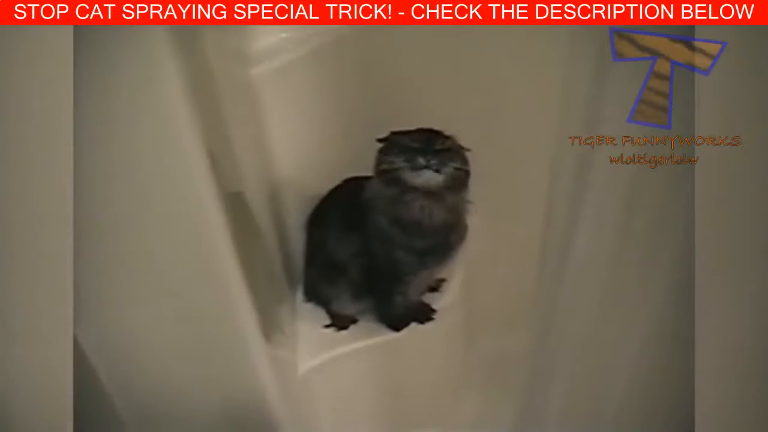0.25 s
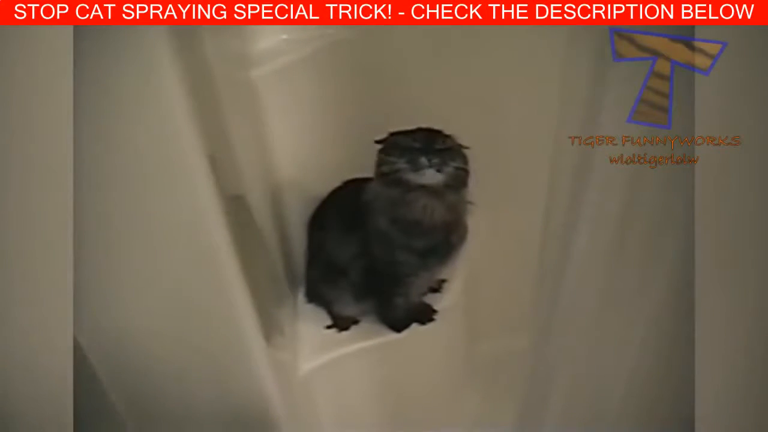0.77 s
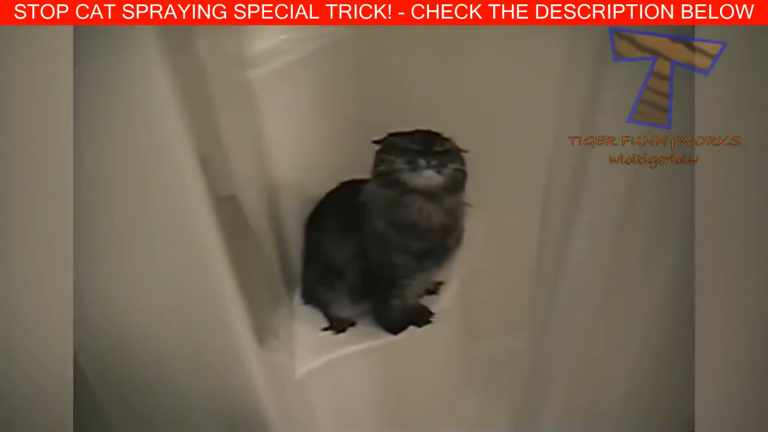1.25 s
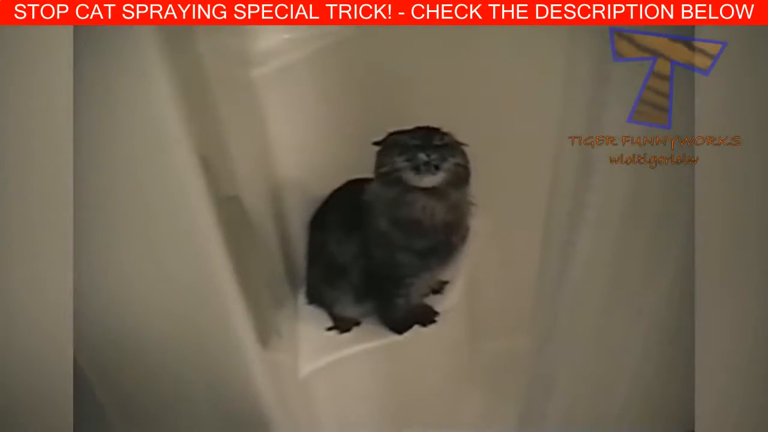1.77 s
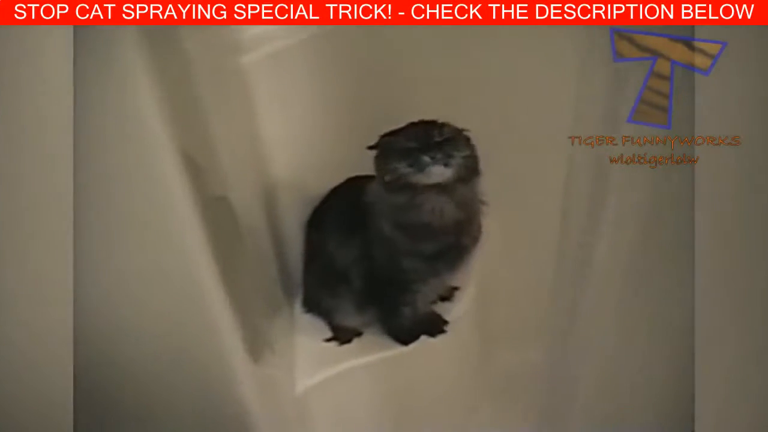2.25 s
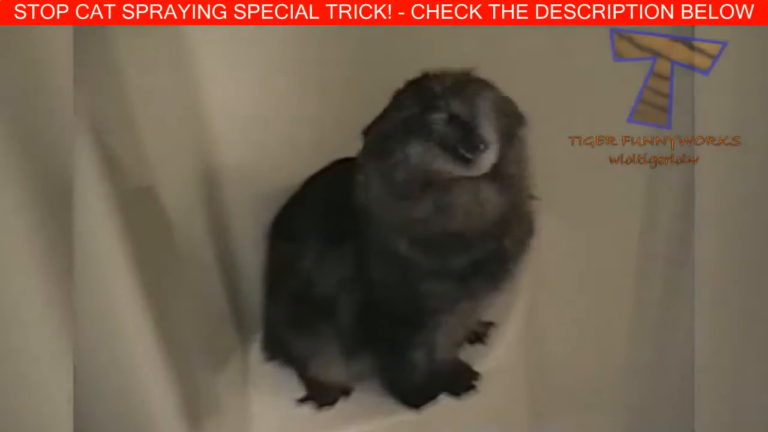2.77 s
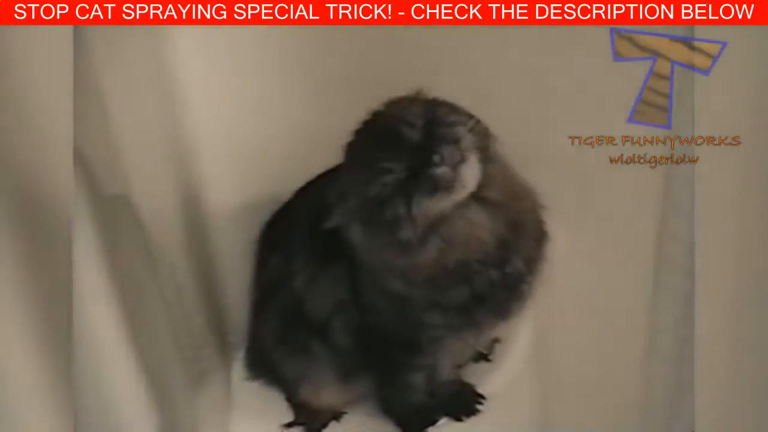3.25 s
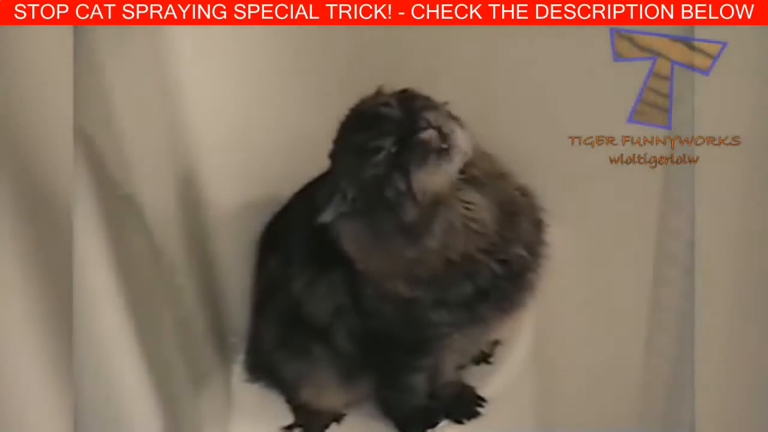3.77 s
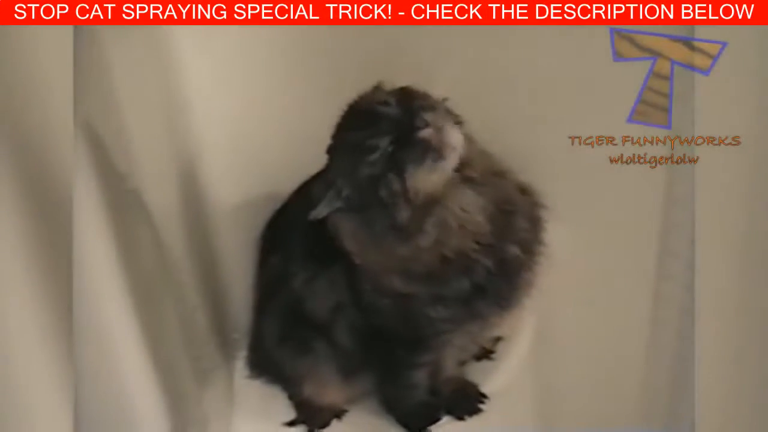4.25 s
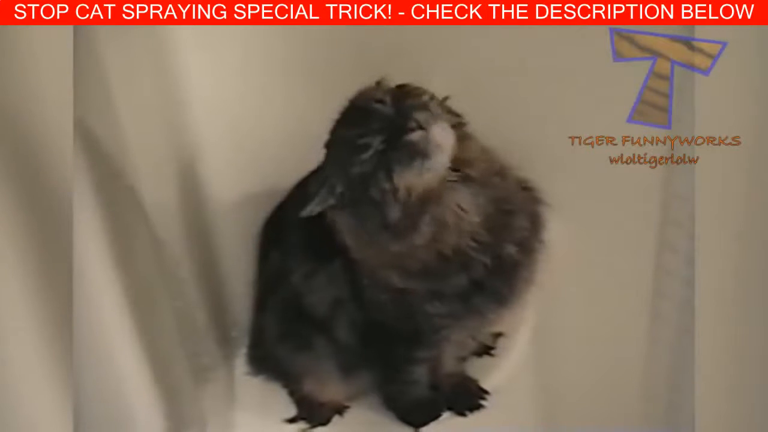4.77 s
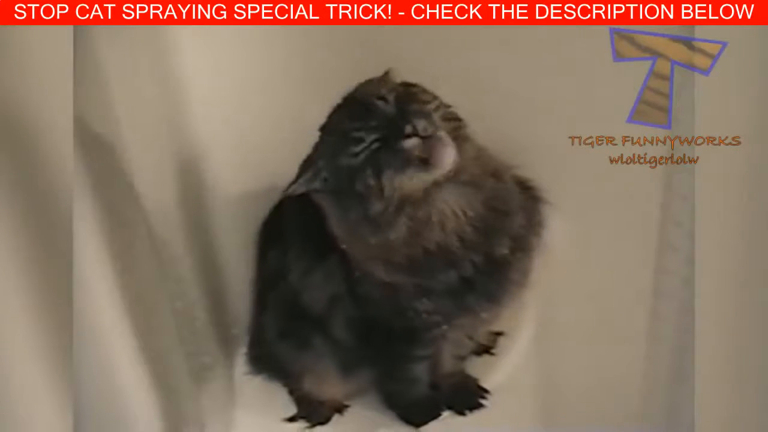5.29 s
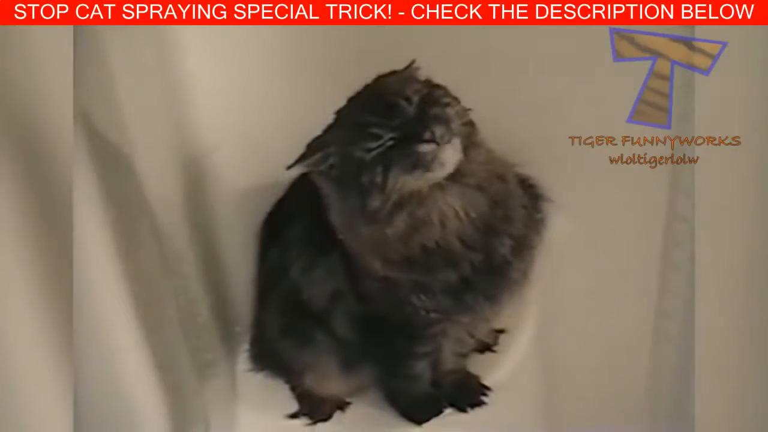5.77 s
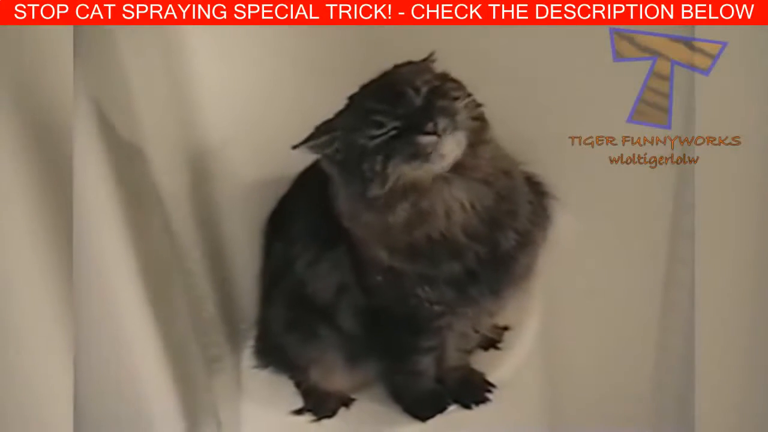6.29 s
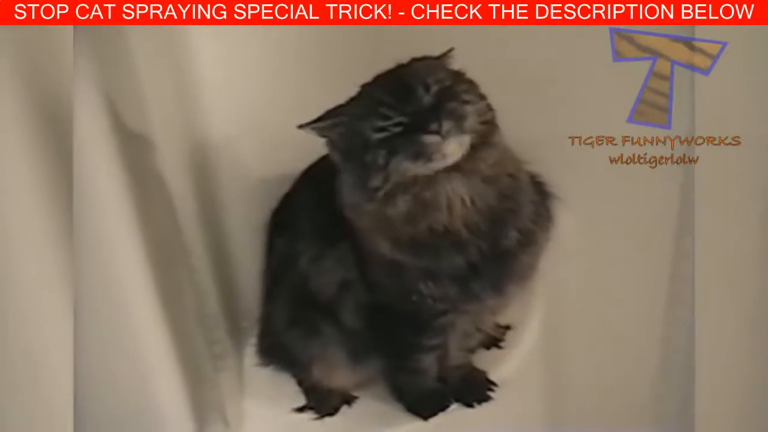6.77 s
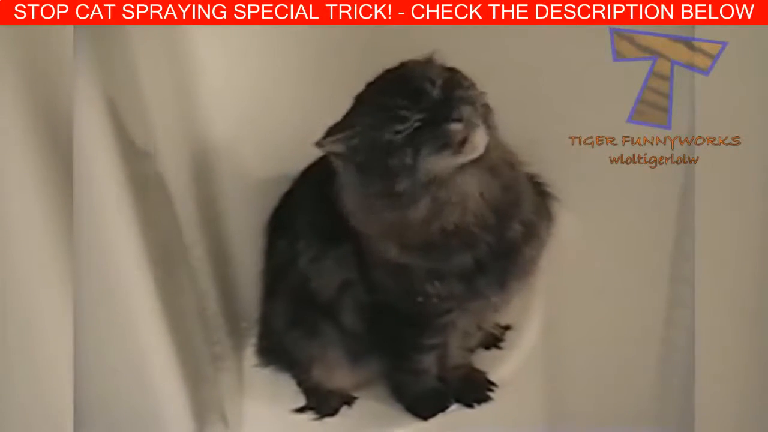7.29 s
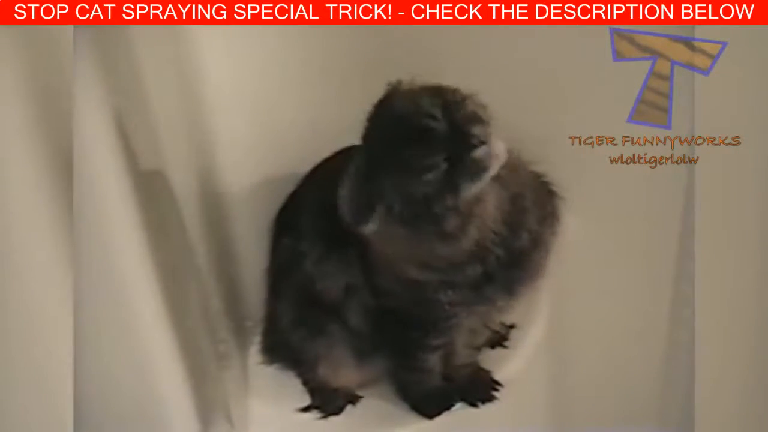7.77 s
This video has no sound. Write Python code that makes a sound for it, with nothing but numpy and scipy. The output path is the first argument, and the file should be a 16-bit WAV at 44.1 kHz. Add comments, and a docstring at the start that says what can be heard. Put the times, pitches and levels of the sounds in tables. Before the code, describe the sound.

From 0 to about 8 seconds a shower sprays continuously into a bathtub. The hiss is bright and grainy, made of thousands of tiny droplets, strongest in the high treble, and its strength drifts only slightly, a little fuller at the start and softer near 4 and 5.5 seconds. Clumps of water slap down irregularly throughout, each a very short smack, a fizzing burst and a short hard-walled bathroom tail. Bold ones come around 0.1 to 0.5, 1.8 to 2.2, 2.7 to 3.0, 4.35, 6.3 to 6.7 and 7.7 seconds. Under this the tub floor drums and rings in a soft, uneven low rumble, and a fan hums faintly. The sound is mono, close, hollow and gently phasing, with slight recorder hiss and no extreme top. It ends with the water still running.

```python
"""A shower hisses into a bathtub with a hollow, phasing colour, and clumps of water splash down in it.
The hiss is thousands of random droplet impacts; each splash is a slap and a burst of droplets,
with the short ring of a small hard room. The tub floor drums and rings, and a fan hums faintly.
The mono sound is doubled by a wavering copy about a millisecond late, which hollows the hiss."""
import sys
import numpy as np
from scipy import signal
from scipy.fft import rfft, irfft, next_fast_len
from scipy.io import wavfile
from scipy.ndimage import map_coordinates

SR = 44100
rng = np.random.default_rng(int(sys.argv[2]) if len(sys.argv) > 2 else 0)


def wrap_up_sound(samples):
    """Save the sound to the file named by the first command line argument, as 16-bit audio."""
    columns = np.atleast_2d(samples).T
    # keep every value between -1 and 1, then stretch to whole-number steps
    tamed = np.clip(columns, -1, 1)
    steps = np.round(tamed * 32767).astype(np.int16)
    wavfile.write(sys.argv[1], SR, steps)


N = 354485  # length of the sound in samples


def undb(db):
    """Turn decibels into a gain."""
    return 10 ** (np.asarray(db) / 20)


def level(x, db):
    """Scale a sound to an rms (average) level in dB."""
    return x * undb(db) / np.sqrt(np.mean(x ** 2))


def curve(rows):
    """Join (seconds, value) rows by straight lines, one value per sample."""
    return np.interp(np.arange(N) / SR, *np.transpose(rows))


def colour(x, points):
    """Make some pitches louder than others, following (Hz, dB) points."""
    size = next_fast_len(N + SR // 4)
    hz, db = np.transpose(points)
    f = np.maximum(np.fft.rfftfreq(size, 1 / SR), 1)
    gain = undb(np.interp(np.log(f), np.log(hz), db))
    return irfft(rfft(x, size) * gain, size)[:N]


def band(x, hz, octaves, order=2):
    """Keep a band of pitches around a centre; order 1 fades out gently at the sides."""
    edges = hz * 2 ** (np.array([-.5, .5]) * octaves)
    return signal.sosfilt(signal.butter(order, edges, "band", fs=SR, output="sos"), x)


def resonate(x, hz, width):
    """Ring at one pitch, like a struck body; gain 1 at its centre, and a narrow width rings longer."""
    b, a = signal.iirpeak(hz, hz / width, fs=SR)
    return signal.lfilter(b, a, x)


def drops(count, rate, spread_db):
    """Impacts at random moments, rate per second, of random size and sign; rms 1."""
    lands = rng.random(count) < rate / SR
    size = undb(spread_db * np.minimum(rng.exponential(size=count), 5))
    sign = rng.choice([-1, 1], count)
    return level(lands * size * sign, 0)


def walk(rate):
    """Smooth random wandering with a spread near 1, through rate random points per second."""
    knots = rng.standard_normal(4096)
    return map_coordinates(knots, [np.arange(N) / SR * rate], order=3, mode="wrap")


def spray():
    """Thousands of droplets a second: the bright part follows the flow, the dull patter on the tub is even."""
    # Strength of the fine spray. Each row: time in seconds, level in dB (only its ups and downs count).
    flow_points = [(0.0, -44.5), (0.25, -48), (0.32, -47.5), (0.6, -46.5), (1.05, -48), (1.22, -47.5),
                   (1.35, -45), (1.48, -47.6), (1.58, -46), (1.66, -47), (1.88, -45.5), (2.1, -47.6),
                   (2.4, -45.5), (2.8, -46.3), (3.05, -47.5), (3.3, -46.5), (3.75, -48), (4.15, -49),
                   (4.65, -48), (4.85, -46), (5.3, -47.3), (5.53, -50), (5.75, -46), (5.95, -47),
                   (6.4, -47.5), (6.62, -47.0), (7.05, -46.5), (7.35, -47.5), (7.7, -47), (8.04, -48.5)]
    # Colour of the fine spray. Each row: pitch in Hz, relative level in dB per Hz.
    spray_colour = [(400, -18), (500, -4.5), (650, -8), (870, -4.5), (1250, -5.5), (1800, -9),
                    (2800, -10.5), (3800, -9.5), (4700, -7.5), (6600, -1), (7600, 1.5), (9400, -6),
                    (13300, -15), (15400, -33)]
    flutter_db, split_hz = 1.0, 3900
    flow_db = curve(flow_points)
    strength_db = flow_db - flow_db.mean() + flutter_db * walk(50)
    bright = drops(N, rate=11000, spread_db=2.0) * undb(strength_db)
    patter = drops(N, rate=9000, spread_db=2)
    bright = signal.sosfilt(signal.butter(3, split_hz, "high", fs=SR, output="sos"), bright)
    patter = signal.sosfilt(signal.butter(3, split_hz, "low", fs=SR, output="sos"), patter)
    return level(colour(bright + patter, spray_colour), -48.0)


def spatter():
    """Small gobs of water break up at random moments, each a sudden, short fizz in three pitch bands."""
    gob_s = 0.011  # time for a gob's fizz to fade to about a third
    out = 0
    for hz, db in [(6200, -65.5), (7800, -57.0), (10300, -63.5)]:
        # each band has its own gobs; every hit jumps up and then dies away
        hits = np.abs(drops(N, rate=70, spread_db=-0.5))
        gobs = signal.lfilter([1], [1, -np.exp(-1 / (gob_s * SR))], hits)
        fizz = drops(N, rate=12000, spread_db=2.5) * gobs
        out = out + level(band(fizz, hz, octaves=0.42), db)
    return out


def bathroom(x):
    """Close hard walls give a dense, short tail of random echoes, new for every landing spot."""
    t60_s, wet_db = 0.35, -5  # time for the tail to fall by 60 dB, and its strength
    t = np.arange(SR // 3) / SR
    tail = rng.standard_normal(len(t)) * np.exp(-np.log(1000) * t / t60_s)
    tail *= undb(wet_db) / np.sqrt(np.sum(tail ** 2))
    tail[0] = 1  # the direct sound
    return signal.fftconvolve(x, tail)


def splash(slap_db, burst_db, hz, octaves):
    """A clump slaps down and bursts into ragged spurts; droplets thrown up patter back a little longer."""
    burst_s, scatter_s, scatter_db = 0.03, 0.1, -13
    ragged_db, spurt_s = 1.5, 0.0066
    attack_s, slap_s, slap_extra_octaves = 0.0011, 0.0046, 0.24
    t = np.arange(SR // 4) / SR

    wander = map_coordinates(rng.standard_normal(256), [t / spurt_s], order=1, mode="wrap")
    spurts = undb(ragged_db * wander)
    # a quick burst, then the weaker, longer scatter
    shape = np.exp(-t / burst_s) + undb(scatter_db) * np.exp(-t / scatter_s)
    droplets = drops(len(t), rate=5000, spread_db=2.0) * spurts
    fizz = level(band(droplets, hz, octaves, order=1), burst_db) * shape

    # the first contact lasts a few milliseconds and covers a wider band
    contact = band(drops(len(t), rate=7200, spread_db=1.0), hz, octaves + slap_extra_octaves)
    slap = level(contact, slap_db) * np.exp(-(t / slap_s) ** 2)

    # the range of droplet sizes bounds the splash above and below
    sizes = signal.butter(3, [2400, 10500], "band", fs=SR, output="sos")
    attack = 1 - np.exp(-t / attack_s)
    return bathroom(signal.sosfilt(sizes, (slap + fizz) * attack))


def small_clumps(count=40):
    """Water gathers and lets go a few times a second, unevenly; rows as in the table of splashes."""
    per_s, slap_db, burst_db, spread_db = 4.5, -47.5, -55.5, 3.5
    centre_hz, spread_octaves, width_octaves = 7300, 0.11, 0.29
    late, size, pitch = rng.uniform(-1, 1, (count, 3)).T
    times = (np.arange(count) + .5 + late / 2) / per_s
    size_db = spread_db * size
    hz = centre_hz * 2 ** (spread_octaves * pitch)
    widths = np.full(count, width_octaves)
    return np.transpose([times, slap_db + size_db, burst_db + size_db, hz, widths])


def splashes():
    """Big and small clumps all splash in the same way, each at its own moment."""
    # Clumps of water that stand out as they land. Each row: start in seconds, level of the slap in dB,
    # level of the burst of droplets in dB (both before fading, filtering, echoes and the final gain),
    # centre of the splash in Hz, its width in octaves.
    big_clumps = [(0.098, -41.0, -49.0, 7400.0, 0.23), (0.174, -39.5, -45.5, 6800, 0.23),
                  (0.364, -41, -43.5, 7250, 0.5), (0.473, -41, -48, 7600, 0.27),
                  (0.651, -45.0, -48.0, 7300.0, 0.18), (1.118, -42.0, -52.0, 7400.0, 0.4),
                  (1.319, -44.0, -48.0, 6900.0, 0.27), (1.73, -45.0, -46.5, 7800.0, 0.35),
                  (1.806, -41.0, -51.5, 7300.0, 0.3), (1.828, -37.5, -52, 5600, 0.32),
                  (2.041, -37.5, -48, 7300, 0.2), (2.141, -39, -49, 6800, 0.21),
                  (2.166, -46, -49.5, 6300, 0.4), (2.489, -44.0, -47.5, 6000.0, 0.3),
                  (2.645, -47.0, -48.5, 7400.0, 0.31), (2.696, -38, -44, 5150, 0.7),
                  (2.884, -44.0, -46.5, 6800.0, 0.25), (2.957, -39.5, -44.5, 5100, 0.7),
                  (3.127, -46.0, -46.0, 7900.0, 0.29), (3.366, -43.0, -47.5, 6900.0, 0.22),
                  (3.905, -44.0, -53.0, 5900.0, 0.4), (3.934, -42.0, -54.0, 6700.0, 0.4),
                  (4.313, -47.0, -45.5, 8100.0, 0.49), (4.352, -39.5, -46, 7900, 0.36),
                  (4.781, -47.0, -48.0, 7500.0, 0.21), (4.825, -47.0, -47.5, 7600.0, 0.56),
                  (4.965, -43.0, -53.0, 5400.0, 0.45), (5.078, -43.0, -52.0, 6000.0, 0.45),
                  (5.143, -41.0, -54.0, 7000.0, 0.4), (5.273, -41.0, -50.0, 7600.0, 0.4),
                  (5.418, -47.0, -48.0, 8200.0, 0.33), (5.634, -43.0, -47.5, 7400.0, 0.35),
                  (6.317, -39.0, -54.0, 6200.0, 0.35), (6.477, -44, -47, 7400, 0.3),
                  (6.53, -37.5, -48, 7300, 0.2), (6.644, -40, -53, 5900, 0.4),
                  (6.659, -43, -49, 6200, 0.38), (6.709, -40, -47.5, 5650, 0.42),
                  (6.954, -44.0, -48.0, 6900.0, 0.4), (7.133, -42.0, -52.0, 7100.0, 0.4),
                  (7.274, -42, -56, 5500, 0.45), (7.46, -44.0, -49.0, 7200.0, 0.4),
                  (7.662, -39.5, -46.5, 7400, 0.26), (7.917, -42, -48, 5950, 0.31)]
    out = np.zeros(N + SR)
    for s, slap_db, burst_db, hz, octaves in [*big_clumps, *small_clumps()]:
        start = int(s * SR)
        if start < N:
            sound = splash(slap_db, burst_db, hz, octaves)
            out[start:start + len(sound)] += sound
    return undb(0.54) * out[:N]


def tub():
    """Drops ring the tub's own pitches, and heavier blows drum on its floor in uneven surges."""
    # Ringing pitches of the tub and the air in it. Each row: pitch in Hz, width in Hz, relative level in dB.
    modes = [(37.5, 5.9, -2.5), (146, 23, -5.5), (157, 5.1, 2), (183, 7.1, -6.5), (194.6, 10.8, 5.5),
             (235.7, 12.3, 3), (266, 13.7, 1), (292.3, 19.4, 0.5), (310, 41, -2.5), (347, 17, 1.5),
             (723, 21, -9.5), (868, 53, -7)]
    # Rumble of the whole tub under the spray. Each row: pitch in Hz, relative level in dB per Hz.
    rumble_colour = [(10, -20), (28, -14), (60, -12), (105, -11.5), (160, -3.5), (260, -4), (340, -3),
                     (430, 2.5), (600, -9), (1200, -29.5)]
    surge_db = 1.5
    blows = drops(N, rate=1500, spread_db=1) * undb(surge_db * walk(11))
    rumble = level(colour(blows, rumble_colour), -61.0)
    ring = 0
    for hz, width, db in modes:
        ring = ring + undb(db) * resonate(drops(N, rate=700, spread_db=2), hz, width)
    return level(ring, -59.0) + rumble


def fan():
    """A fan motor hums faintly: a few pure tones, each wavering slightly in pitch."""
    # Tones of the hum. Each row: pitch in Hz, level in dB before the doubling.
    tones = [(60, -84), (90, -84), (120, -83)]
    waver = 0.63  # how far each tone runs ahead or behind, in radians
    t = np.arange(N) / SR
    return sum(level(np.sin(2 * np.pi * hz * t + waver * walk(1.94)), db) for hz, db in tones)


def doubled(x):
    """A late, duller copy cancels evenly spaced pitches; each low notch shifts, deepens and fills on its own."""
    # Waver around each low notch; the last row also covers the treble. Each row: pitch in Hz,
    # extra lag in ms, waver of the lag in ms, waver of the strength in dB (unrest scales both wavers).
    notches = [(450, .05, .025, .7), (1390, .016, .01, .7), (2340, .004, .008, .7), (3290, 0, .008, 1.1),
               (4230, 0, .007, 1.1), (5170, 0, .003, .5)]
    # Drift of the lag. Each row: time in seconds, lag in ms.
    lag_points = [(0.0, 1.045), (0.35, 1.071), (0.42, 1.055), (0.77, 1.066), (0.84, 1.043), (0.94, 1.04),
                  (1.01, 1.06), (1.08, 1.049), (1.15, 1.075), (1.36, 1.053), (1.64, 1.078), (1.74, 1.055),
                  (1.88, 1.06), (2.05, 1.09), (2.16, 1.045), (2.51, 1.069), (2.79, 1.045), (2.89, 1.055),
                  (3.07, 1.037), (3.38, 1.084), (3.45, 1.059), (3.59, 1.059), (3.66, 1.078), (4.11, 1.042),
                  (4.18, 1.066), (4.53, 1.051), (4.6, 1.073), (4.81, 1.058), (5.12, 1.064), (5.19, 1.05),
                  (5.54, 1.08), (5.85, 1.042), (5.92, 1.063), (6.13, 1.04), (6.27, 1.042), (6.41, 1.074),
                  (6.51, 1.049), (6.69, 1.074), (6.83, 1.077), (6.93, 1.043), (7.28, 1.051), (7.45, 1.024),
                  (7.66, 1.044), (8.01, 1.023)]
    # how many random points a second each wandering passes through
    lag_rate, strength_rate, unrest_rate = 22, 18, 10
    unrest_db = 7  # the waver comes and goes; in calm moments a notch is at its deepest
    dull_share, dull_hz = .33, 7500  # the copy loses some treble

    lowpassed = signal.lfilter(*signal.butter(1, dull_hz, fs=SR), x)
    dull = (1 - dull_share) * x + dull_share * lowpassed
    size = next_fast_len(N)
    spectrum, f = rfft(dull, size), np.fft.rfftfreq(size, 1 / SR)
    centres = np.array(notches)[:, 0]
    late = 0
    for hz, extra_ms, waver_ms, waver_db in notches:
        # the share of the copy around this notch, blending into its neighbours
        part = irfft(spectrum * np.interp(f, centres, centres == hz), size)
        unrest = undb(unrest_db * np.minimum(walk(unrest_rate), 1))
        lag_ms = curve(lag_points) + extra_ms + unrest * waver_ms * walk(lag_rate)
        part = map_coordinates(part, [np.arange(N) - lag_ms * SR / 1000], order=5)
        late = late + part * undb(unrest * waver_db * walk(strength_rate))
    return (x + late) / np.sqrt(2)


def scene():
    """Water, tub and fan mixed to one mono sound, the same on both channels."""
    mono = spray() + spatter() + splashes() + tub() + fan()
    return np.array([mono, mono])


def record(dry):
    """The sound is doubled; the recorder adds a steady hiss and cuts the top."""
    # Colour of the recorder's hiss. Each row: pitch in Hz, relative level in dB per Hz.
    hiss_colour = [(100, 7.5), (450, -3.5), (1400, -20), (3300, -22), (5200, -9), (7500, 0.5), (10000, 2),
                   (13000, -13), (15400, -18)]
    hiss_db, top_hz = -64, 15500  # the hiss level is before the cut
    hiss = level(colour(rng.standard_normal(N), hiss_colour), hiss_db)
    mono = doubled(dry[0]) + hiss
    mono = signal.sosfilt(signal.ellip(10, .2, 70, top_hz, fs=SR, output="sos"), mono)
    return np.array([mono, mono])


dry = scene()
out = record(dry)
wrap_up_sound(out)
```